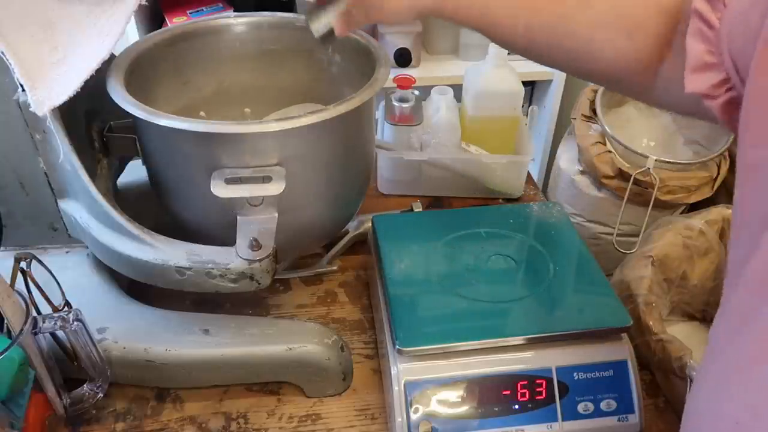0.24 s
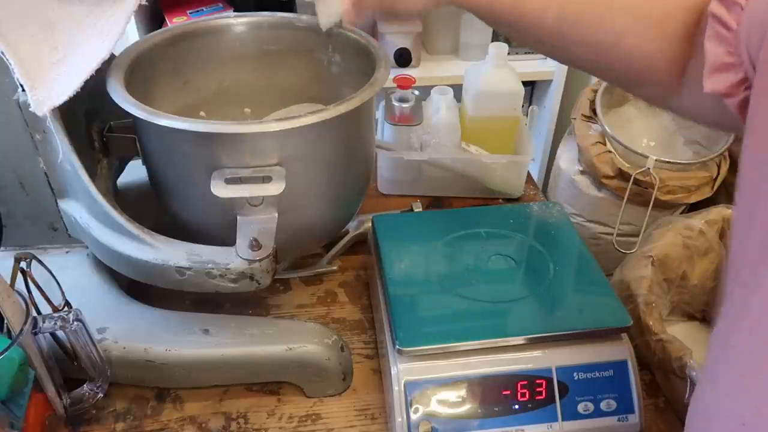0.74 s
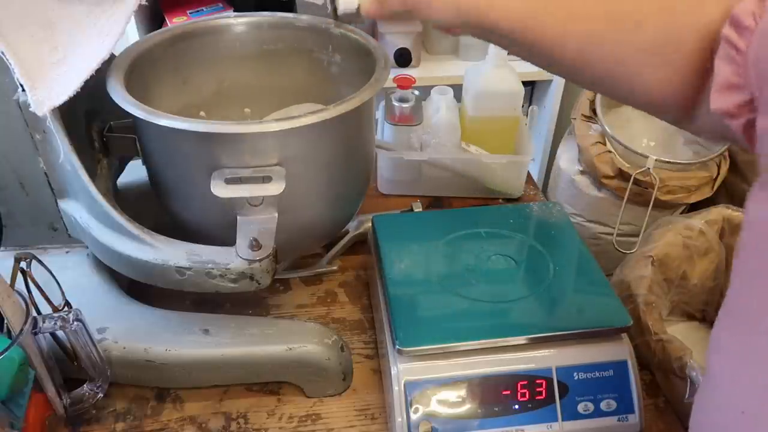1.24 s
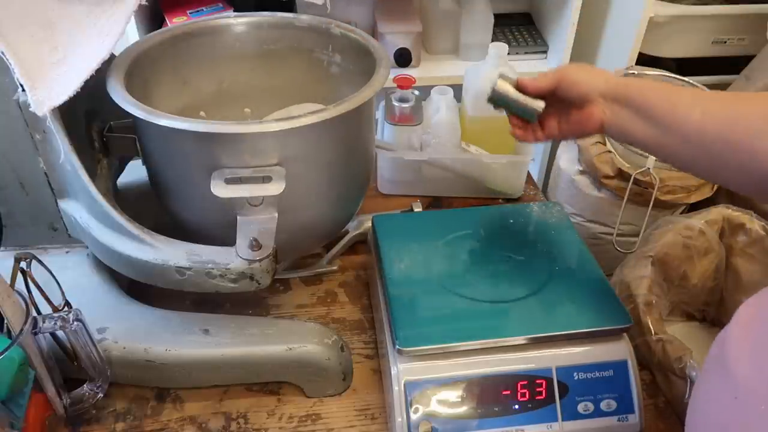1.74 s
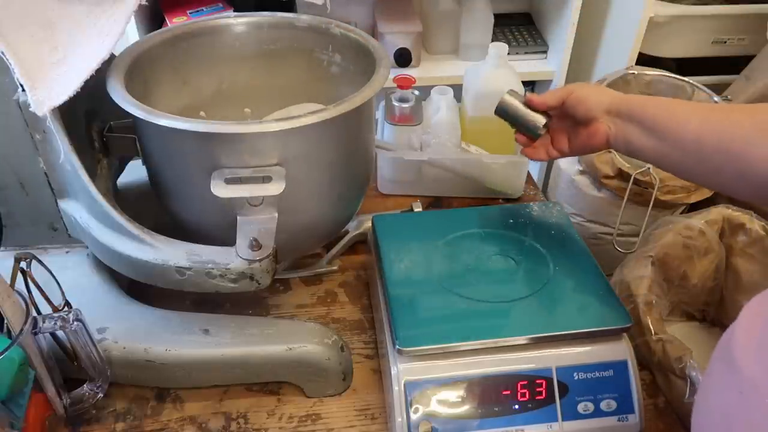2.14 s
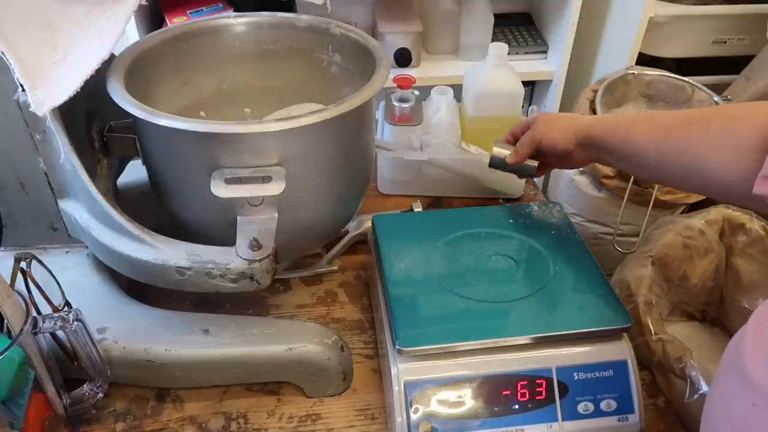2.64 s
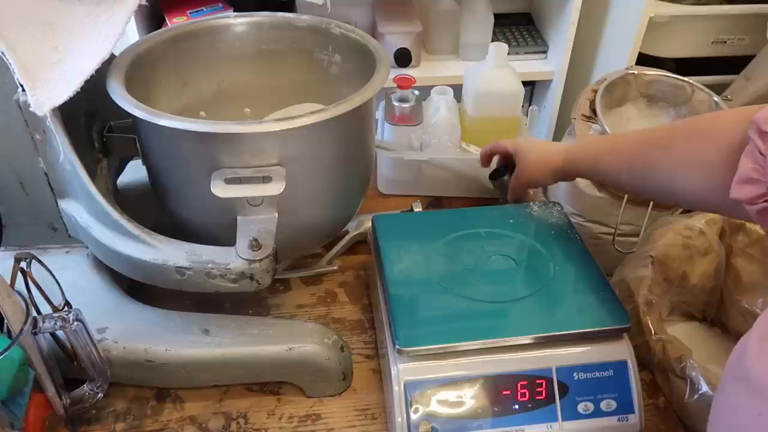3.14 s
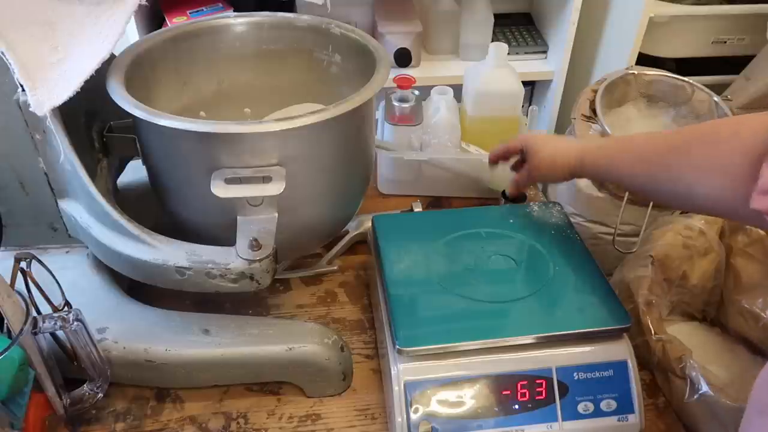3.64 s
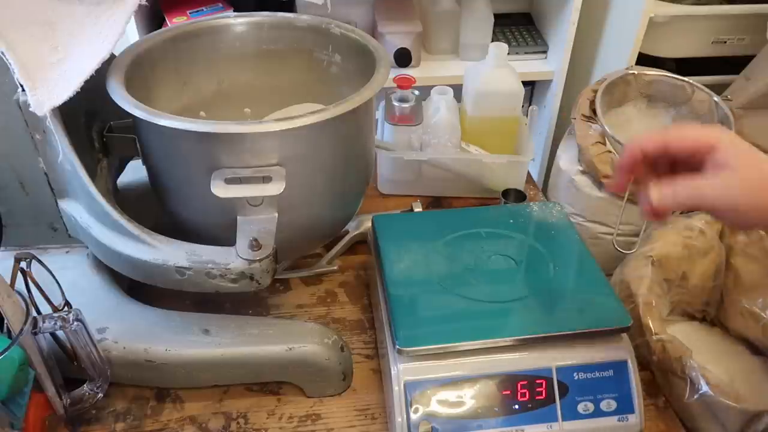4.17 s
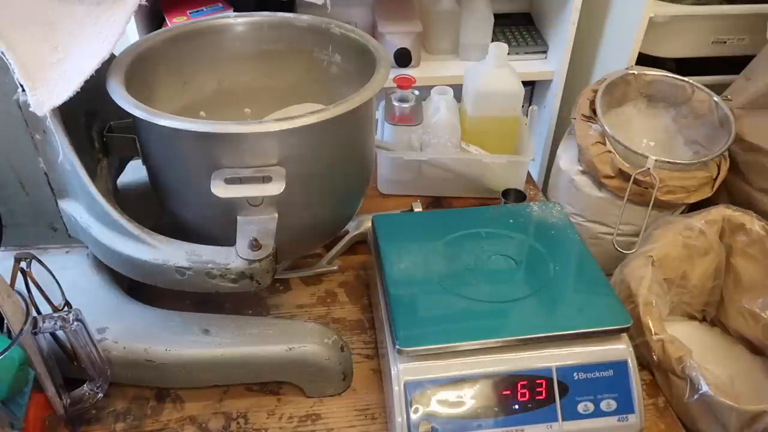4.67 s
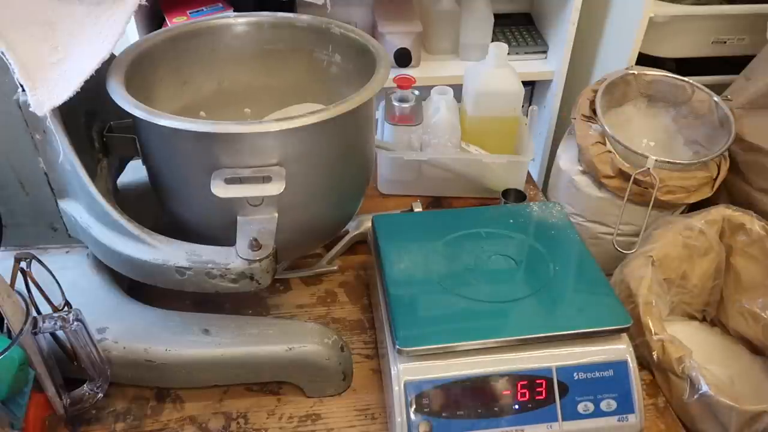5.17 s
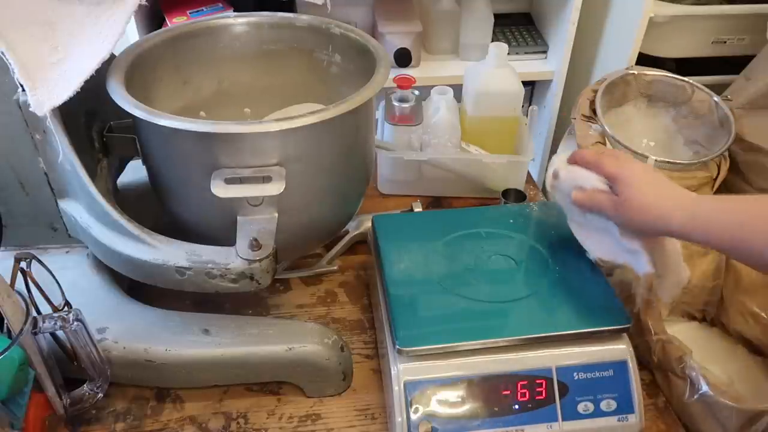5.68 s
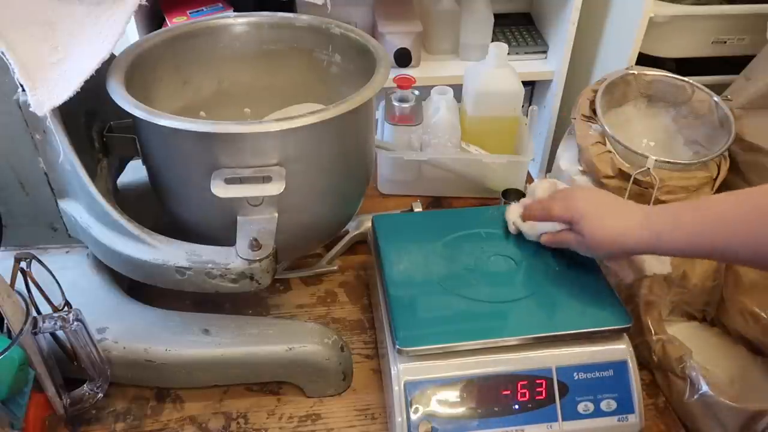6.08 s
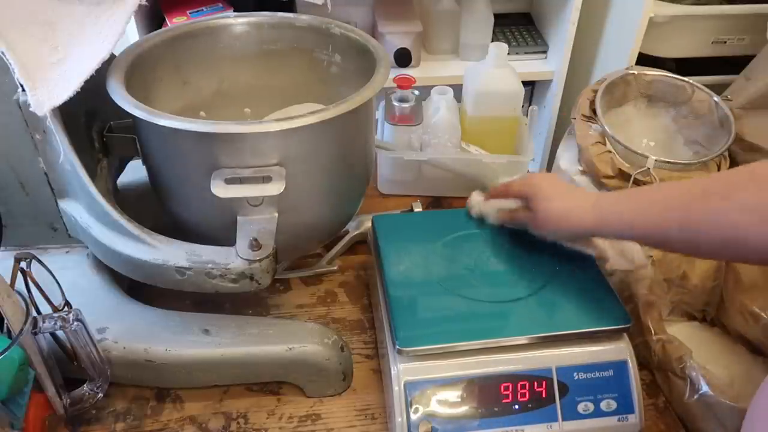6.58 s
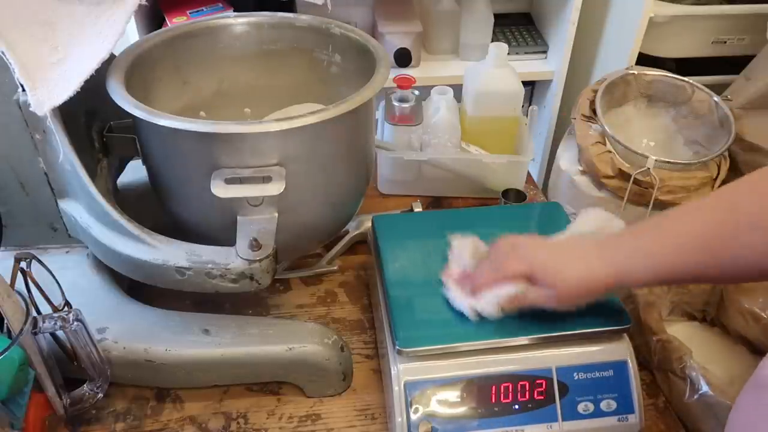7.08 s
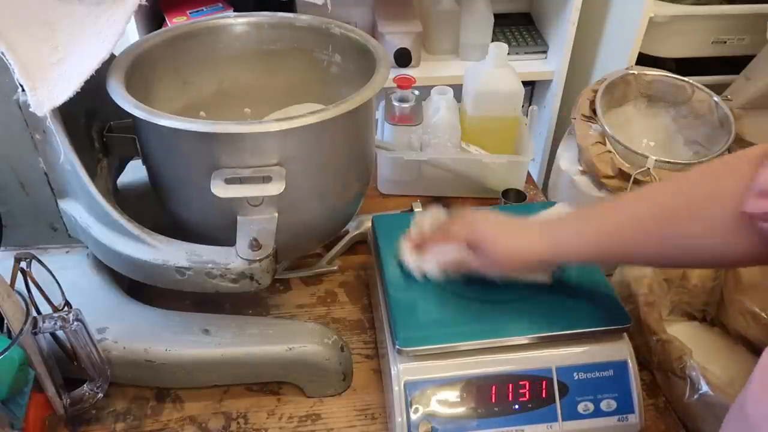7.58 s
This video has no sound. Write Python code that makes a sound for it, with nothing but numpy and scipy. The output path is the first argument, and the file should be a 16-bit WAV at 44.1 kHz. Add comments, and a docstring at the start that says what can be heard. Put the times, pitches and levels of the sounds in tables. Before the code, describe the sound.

In a small workroom a distant rotating machine hums steadily over soft airy room noise. Faint handling scuffs come first, then a small jar is set down with one loud, sharp knock on a wooden bench and a quick rattle. The hum sinks to a deep, softer drone. Near the end a cloth wipes a scale in soft hissing strokes, with light bumps and thin metallic clinks. Close phone pickup, short room echo.

```python
"""A small jar is handled and set on a wooden bench, then a cloth wipes a scale pan that knocks and clinks.
Each knock is a short push that sets fading tones ringing; scuffs and cloth are shaped noise.
Behind them a far-off rotating machine hums on multiples of its shaft rate, sagging in pitch and
lifting a little at the end, over a wash of room noise. A phone near the bench hears it through two ports."""
import sys
import numpy as np
from scipy import signal
from scipy.fft import rfft, irfft
from scipy.io import wavfile
from scipy.ndimage import uniform_filter1d

SR = 44100
rng = np.random.default_rng(int(sys.argv[2]) if len(sys.argv) > 2 else 0)


def waveform_to_disk(signal):
    """Save audio, clipped to [-1, 1], as 16-bit WAV at the path in sys.argv[1]."""
    frames = np.transpose(np.atleast_2d(signal))
    scaled = np.clip(frames, -1, 1) * 32767
    samples = np.round(scaled).astype(np.int16)
    wavfile.write(sys.argv[1], SR, samples)


N = 344538
T = np.arange(N) / SR  # seconds

# Slow level changes of the room noise. Each row: time in seconds, then middle, presence and treble in dB.
WASH_LEVELS = [(0, 0.5, 2, 0), (.8, -0.5, -.5, -1), (2.1, -2, -1.5, -2.5), (2.7, 1.5, 0, -0.5),
               (3.9, 0.5, 2, -1), (4.5, -1, 2, -1.5), (5, 2, 4, 0.5), (5.5, -1.5, 2, 0), (6.1, 0, 2.5, 0),
               (7.5, 0, 3, 1), (7.81, 2, -1.5, -0.5)]
# Colour of the noise common to both ports. Each row: frequency in Hz, relative level in dB per Hz.
WASH_MID_COLOUR = [(100, -28), (170, -3), (193, -21), (235, -6.5), (287, -8.5), (485, -10.5), (561, -17.5),
                   (648, -15.5), (982, -19.5), (1110, -16.5), (1780, -20.5), (10700, -44), (12800, -55.5),
                   (16600, -79), (22000, -120)]
# Colour of the noise opposite on the ports. Each row: frequency in Hz, relative level in dB per Hz.
WASH_SIDE_COLOUR = [(59, -43), (100, -28), (141, -38), (195, -4.5), (406, 0), (843, -8), (1550, -8.5),
                    (4280, -15), (9250, -23.5), (12800, -20.5), (16600, -47), (22000, -120)]
# Colour of the low rumble. Each row: frequency in Hz, relative level in dB per Hz.
RUMBLE_COLOUR = [(18, -20), (35, 1), (70, 3), (120, 4), (160, 3), (200, -4), (260, -35)]
# Faint narrow bands that come and go in the wash. Each row: start and end in seconds, centre in Hz,
# reach to either side in Hz, rms level in dB before it swells and flickers.
NARROW_BANDS = [(0, 0.8, 1110, 110, -60), (0, 0.75, 1750, 260, -59), (0, .8, 756, 140, -59.5),
                (1, 1.5, 640, 40, -60.5), (3.75, 4.2, 480, 40, -54), (4.75, 5.3, 2230, 300, -62),
                (5.2, 5.95, 1440, 70, -62), (4.85, 5.33, 750, 150, -59), (6.6, 7.85, 1215, 100, -61.5),
                (7, 7.54, 1440, 54, -61), (6, 6.8, 750, 48, -61.5), (5, 6.1, 3530, 300, -66.5),
                (6.5, 7.75, 290, 60, -55)]
MID_DB, SIDE_DB, RUMBLE_DB = -46.5, -55.5, -44  # rms, mid and rumble before their level changes
RUMBLE_SHARE = 0.79  # the low end follows the middle's level changes by this share

# Turning speed of the machine. Each row: time in seconds, shaft rate in Hz.
SHAFT_RATE = [(0, 12.89), (.8, 12.88), (1.5, 12.78), (2.8, 12.67), (5, 12.42), (5.6, 12.21), (6.2, 12.15),
              (7, 12.19), (7.81, 12.33)]
# The two strong orders (multiples of the shaft rate), before flutter.
# Each row: time in seconds, rms level of order 4 in dB, rms level of order 8 in dB.
STRONG_ORDERS = [(0, -49, -29), (.25, -41, -29), (.6, -42, -27), (1.5, -38.5, -27.5), (2.1, -36, -25),
                 (2.7, -34.5, -27), (3.15, -34, -32.5), (3.75, -32, -36), (4.0, -31.5, -39.5),
                 (4.7, -31.5, -37), (4.95, -32, -45), (5.25, -31, -45), (5.5, -30.5, -55),
                 (5.9, -30.5, -55), (6.8, -33.5, -47.5), (7.25, -40, -40), (7.81, -40, -40.5)]
# Weaker orders that swell and fade. Each row: order, the two arch times in seconds (either may come
# first), rms level at the top in dB before flutter.
SWELLING_ORDERS = [(11, 0, 3.3, -45.5), (12, 0.13, 4.8, -44.5), (13, 0.93, 3.26, -44.5),
                   (11, 6.5, 9.8, -48.5), (13, 6, 7.4, -51.5), (19, 5.5, 7.83, -51.5),
                   (15, 2.5, 3.2, -51.5), (15, 6, 7.5, -53), (22, 6.5, 7.6, -54), (12, 6, 5.4, -53.5)]
# Order 8 also arrives scattered, so it wavers when the direct part is weak.
SCATTER_DB, SCATTER_PER_S = -47.5, 11  # rough rms level, random levels per second

# Fading noise of the room: time to fall 60 dB, strength of the tail, side strength as a share of mid.
ROOM_T60_S, ROOM_DB, ROOM_WIDE = 0.18, -11, 0.11

# Wiping strokes. Each row: time of the turn in seconds, rms level there in dB before the grain.
CLOTH_STROKES = [(6.078, -61.5), (6.22, -65), (6.368, -59.5), (6.745, -57), (7.122, -61), (7.482, -62),
                 (7.83, -59.5)]
STROKE_RISE_DB_PER_S, STROKE_FALL_DB_PER_S = 58, 200

# Short scuffs and ticks of fingers and jar. Each row: start in seconds, rms level in dB before shaping,
# rise in ms, time to fall 60 dB in ms, centre in Hz, level two octaves off the centre in dB.
SCUFFS = [(1.587, -48.5, 1, 130, 8700, 7), (2.694, -42, 9.6, 160, 1100, -12),
          (2.704, -40.5, 3.5, 230, 1230, -12.5), (7.085, -48, 3.5, 130, 1100, -11),
          (3.476, -45, 1.5, 88, 3000, -18), (3.496, -35.5, 4, 190, 1130, -18),
          (3.935, -58, 9.7, 120, 8000, -14), (5.11, -53, 2, 40, 5000, -39),
          (5.708, -57, 1.6, 41, 8660, -25), (6.366, -45, 0.85, 330, 2200, -22),
          (6.742, -45.5, 2.2, 110, 2400, -20)]

# Knocks on wood. Each row: start in seconds, peak level in dB, contact in ms (when the push is
# strongest), rattle in ms (time constant), ring scale (multiplies the ring times of the struck body).
KNOCKS = [(3.476, -7, 0.15, 6.3, 0.55), (3.4975, -25, 0.069, 8, 0.45), (3.518, -24.5, 0.17, 9.4, 0.35),
          (3.531, -28.5, 0.13, 6, 0.37), (3.6124, -23.5, 0.38, 1.8, 0.53), (6.372, -28.5, 0.58, 2, 0.46)]
# The wiping hand bumps the scale. Each row: start in seconds, peak level in dB, contact in ms,
# rattle in ms, ring scale.
BUMPS = [(6.3662, -25, 0.072, 3, 0.6), (6.381, -32, 0.08, 6, .8), (6.393, -37, 0.16, 6, .7),
         (7.3685, -36, 0.33, 2, 0.67), (7.377, -33, 0.45, 2, .9), (7.7425, -22.5, 0.093, 3.4, 0.81),
         (7.749, -27, 0.23, 3, 0.42), (7.755, -36, 0.18, 3, .6), (7.772, -39, 0.15, 3, 0.65)]
# Metal clinks of the scale. Each row: start in seconds, peak level in dB, ring scale.
CLINKS = [(6.744, -31.5, 1.15), (7.0863, -40, .55)]
# Tones of the wooden bench. Each row: frequency in Hz, relative level in dB,
# time to fall 60 dB in seconds at ring scale 1.
BENCH_MODES = [(288, -8.5, 0.078), (436, 6, 0.069), (525, -1.5, 0.093), (622, 4, 0.065), (780, 5, 0.065),
               (912, -0.5, 0.11), (980, -3, 0.1), (1212, -0.5, 0.12), (1430, 2, 0.093), (1560, -0.5, 0.09),
               (1730, -1, .06), (1970, -3, 0.08), (2160, -3, .08), (2320, -13, .07), (2645, -9, 0.06),
               (3060, -9, .06), (3360, -3, 0.059), (3780, -6, 0.08)]
# Tones of the scale's housing. Each row: frequency in Hz, relative level in dB,
# time to fall 60 dB in seconds at ring scale 1.
HOUSING_MODES = [(632, 2.5, 0.033), (735, 1, 0.047), (880, -3, 0.062), (1070, -3, 0.046),
                 (1235, -5.5, 0.067), (1603, -4.5, 0.064), (2050, -12, 0.052), (2500, -17, 0.046),
                 (3730, -17, .04)]
# Tones of the scale pan. Each row: frequency in Hz, relative level in dB,
# time to fall 60 dB in seconds at ring scale 1.
PAN_MODES = [(700, -3, .06), (1050, -2, .07), (1400, -8, .04), (1730, -8, .04), (2070, 1, .12),
             (3350, -6, .04)]
RATTLE_DB = -33  # grit of each knock, under its first blow
TOP_HZ = 12950  # where the phone starts to cut the treble


def undb(db):
    """Turn decibels into gain."""
    return 10 ** (np.asarray(db) / 20)


def level(x, db):
    """Scale a sound to an rms level."""
    return x * undb(db) / np.sqrt(np.mean(x ** 2))


def walk(rate):
    """Random levels, each held for 1 / rate seconds, then smoothed twice; spread near 1."""
    hold = int(SR / rate)
    steps = np.repeat(rng.standard_normal(N // hold + 1), hold)
    smooth = uniform_filter1d(uniform_filter1d(steps, hold), hold)
    return 1.3 * smooth[:N]


def arch(start, end):
    """Gain that swells from silence to 1 and back."""
    progress = np.clip((T - start) / (end - start), 0, 1)
    return np.sqrt(np.sin(np.pi * progress).clip(0))


def coloured(points, size=N):
    """Spectrum of noise shaped by (Hz, dB) points, with its frequencies."""
    hz = np.fft.rfftfreq(size, 1 / SR)
    f, db = np.transpose(points)
    gain = undb(np.interp(np.log(hz + 1), np.log(f), db, left=-120, right=-120))
    return rfft(rng.standard_normal(size)) * gain, hz


def coloured_noise(points, size=N):
    """Noise whose loudness at each pitch follows (Hz, dB) points."""
    return irfft(coloured(points, size)[0], size)


def add(out, s, x):
    """Lay a sound in at a time in seconds."""
    i = int(s * SR)
    out[i:i + len(x)] += x[:N - i]


def wash(flicker_db=1.2):
    """Room noise in octave bands that flicker separately, plus a steady hiss opposite on the two ports."""
    s, middle_db, presence_db, treble_db = np.transpose(WASH_LEVELS)
    low_db = RUMBLE_SHARE * middle_db
    spectrum, hz = coloured(WASH_MID_COLOUR)
    spectrum = spectrum * undb(MID_DB) / irfft(spectrum, N).std()

    rumble = level(coloured_noise(RUMBLE_COLOUR), RUMBLE_DB)
    mid = rumble * undb(np.interp(T, s, low_db) + 1.1 * walk(3.6))

    for centre in 100 * 2. ** np.arange(8):
        # neighbouring bands overlap so that their gains add up to one
        octaves_off = np.clip(np.log2((hz + 1) / centre), -1, 1)
        window = np.cos(np.pi / 2 * octaves_off) ** 2
        if centre < 500:
            db = low_db
        elif centre < 2000:
            db = middle_db
        elif centre < 4000:
            db = presence_db
        else:
            db = treble_db
        mid += irfft(spectrum * window, N) * undb(np.interp(T, s, db) + flicker_db * walk(13))

    for start, end, f, reach, db in NARROW_BANDS:
        narrow = coloured_noise([(f - reach, -20), (f, 0), (f + reach, -20)])
        mid += level(narrow, db) * arch(start, end) * undb(1.7 * walk(9.9))
    side = level(coloured_noise(WASH_SIDE_COLOUR), SIDE_DB)
    return np.array([mid, side])


def hum(flutter_db=.07, wander=.025, fade_db=3):
    """Orders of one shaft; on the long way each flutters in level and phase, the higher ones more."""
    s, fourth_db, eighth_db = np.transpose(STRONG_ORDERS)
    turn = 2 * np.pi * np.cumsum(np.interp(T, *np.transpose(SHAFT_RATE))) / SR  # shaft angle in radians
    gains = [(4, undb(np.interp(T, s, fourth_db))), (8, undb(np.interp(T, s, eighth_db)))]
    for order, start, end, db in SWELLING_ORDERS:
        gains.append((round(order), undb(db) * arch(start, end)))

    scattered = walk(SCATTER_PER_S) * np.sin(8 * turn) + walk(SCATTER_PER_S) * np.cos(8 * turn)
    out = undb(SCATTER_DB) * scattered
    for order, gain in gains:
        shake = order * wander * walk(5.2) + 2 * np.pi * rng.random()
        # orders above 8 also fade slowly
        flutter = undb(order * flutter_db * walk(20) + (order > 8) * fade_db * walk(4))
        out = out + np.sqrt(2) * gain * flutter * np.sin(order * turn + shake)
    return out


def room(x):
    """Echoes as fading noise tails for mid and side, with the treble softened."""
    t = T[:SR // 2]
    fade = 1000. ** (-t / ROOM_T60_S)
    onset = np.minimum(t / 0.0025, 1)
    tail = rng.standard_normal((2, len(t))) * fade * onset
    tail = signal.sosfilt(signal.butter(1, 2500, fs=SR, output="sos"), tail)
    tail *= undb(ROOM_DB) / np.sqrt(np.sum(tail[0] ** 2)) * np.array([[1], [ROOM_WIDE]])
    return signal.fftconvolve(x[None], tail, axes=1)[:, :N]


def cloth(grain_db=2.0, wide=0.75):
    """Fibres slipping over the pan: grainy hiss that builds through each stroke and drops at the turn."""
    strokes = []
    for s, top_db in CLOTH_STROKES:
        drop_db = np.where(T < s, STROKE_RISE_DB_PER_S * (s - T), STROKE_FALL_DB_PER_S * (T - s))
        strokes.append(top_db - drop_db)
    gain = undb(np.max(strokes, axis=0) + grain_db * walk(150))
    colour = [(1500, 3), (4000, 3.5), (9000, -6.0), (13000, -6.0)]  # Hz, relative dB
    # separate hisses for mid and side
    return np.array([level(coloured_noise(colour), 0) * gain * share for share in (1, wide)])


def scuffs():
    """Fingers and jar rubbing: brief gritty noise around a centre frequency."""
    out, t = np.zeros(N), T[:SR // 4]
    t_ms = 1000 * t
    for s, db, rise_ms, t60_ms, hz, skirt_db in SCUFFS:
        colour = [(hz / 8, 2 * skirt_db), (hz / 4, skirt_db), (hz, 0),
                  (hz * 4, skirt_db), (hz * 16, 4 * skirt_db)]
        grit = coloured_noise(colour, size=len(t))
        rise = np.minimum(t_ms / rise_ms, 1)
        fall = 1000. ** (-np.maximum(t_ms - rise_ms, 0) / t60_ms)
        add(out, s, level(grit, db) * rise * fall)
    return out


def ring(modes, stretch=1):
    """Fading tones of a struck body, neighbouring ones pushed in opposite directions."""
    t = T[:SR // 2]
    out = np.zeros(len(t))
    for k, (f, db, t60) in enumerate(modes):
        fade = 1000. ** (-t / (t60 * stretch))
        out += (-1) ** k * undb(db) * np.sin(2 * np.pi * f * t) * fade
    return out


def add_peak(out, s, x, db):
    """Lay a sound in at a time, scaled to a peak level."""
    add(out, s, x * undb(db) / np.abs(x).max())


def knocks():
    """A blow and brief rattle ring bench or scale; a longer push sounds duller. Clinks ring the pan."""
    out, t = np.zeros(N), T[:SR // 20]
    blows = [(BENCH_MODES, *knock) for knock in KNOCKS] + [(HOUSING_MODES, *bump) for bump in BUMPS]
    for body, s, db, contact_ms, rattle_ms, stretch in blows:
        push = t * np.exp(-1000 * t / contact_ms)
        rattle = undb(RATTLE_DB) * rng.standard_normal(len(t)) * np.exp(-1000 * t / rattle_ms)
        rattle[0] = 1  # the first blow
        x = signal.fftconvolve(ring(body, stretch), np.convolve(rattle, push))
        add_peak(out, s, x, db)
    for s, db, stretch in CLINKS:
        add_peak(out, s, ring(PAN_MODES, stretch), db)
    return out


def scene():
    """Add up the mid and side of all sources, then turn them into left and right."""
    near = knocks() + scuffs()
    mid, side = wash() + cloth() + room(near)
    mid = mid + hum() + near
    # the two ports hear near treble a little apart in time
    side = side + .9 * np.gradient(near)
    return np.array([mid + side, mid - side])


def record(dry):
    """The phone cuts the top with a steep low-pass filter."""
    return signal.sosfilt(signal.ellip(8, .2, 70, TOP_HZ, fs=SR, output="sos"), dry)


dry = scene()
out = record(dry)
waveform_to_disk(out)
```